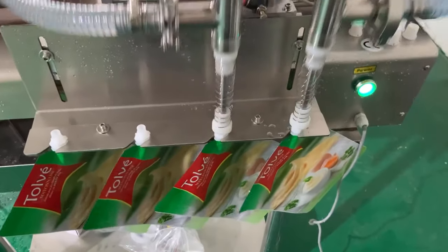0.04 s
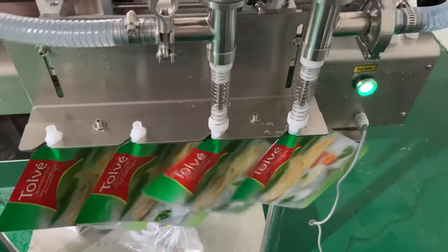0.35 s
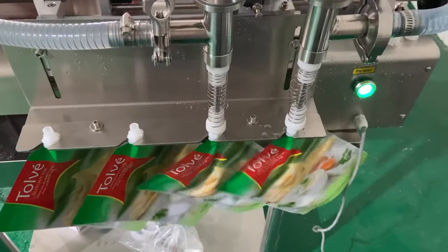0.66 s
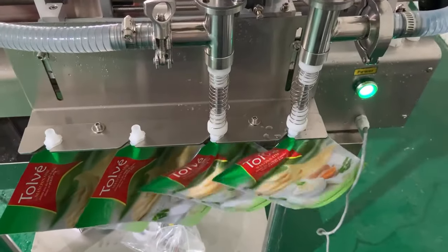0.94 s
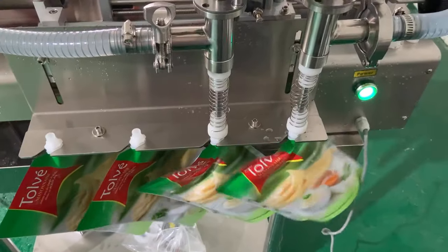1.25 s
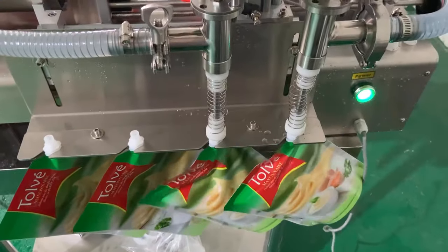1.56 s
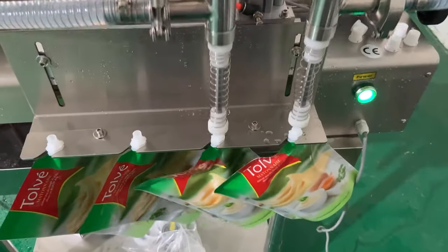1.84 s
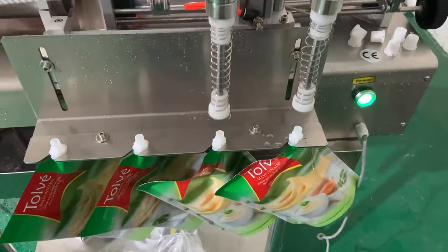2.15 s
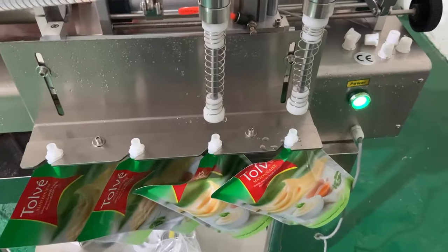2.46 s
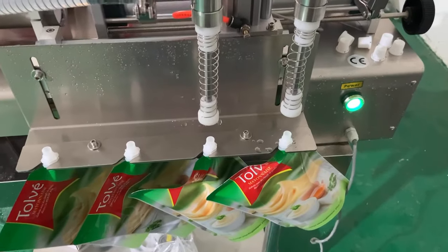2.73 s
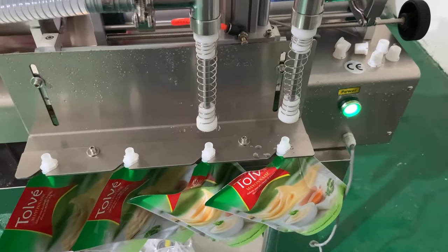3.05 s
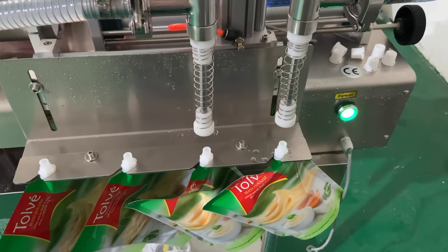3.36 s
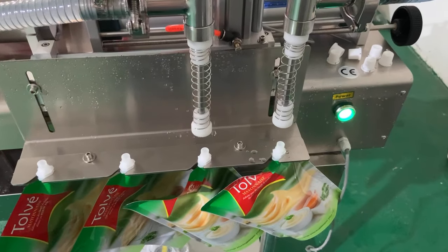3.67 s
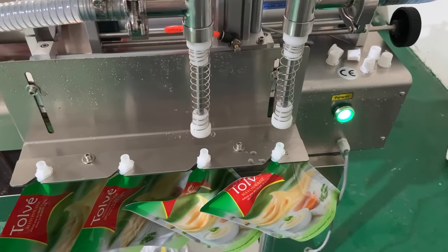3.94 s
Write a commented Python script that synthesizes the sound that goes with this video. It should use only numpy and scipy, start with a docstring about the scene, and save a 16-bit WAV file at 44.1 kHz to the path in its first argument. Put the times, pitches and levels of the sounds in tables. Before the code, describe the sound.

Air hisses loudly from a pouch filling machine close by from the start, with liquid rushing through ringing pipes. Around 1.2 to 1.6 seconds come thumps, a pipe shudder and a brighter jet of air. Hollow knocks sound at about 2.1 and 2.4 seconds as the hiss dies away. A metal valve clicks faintly at 2.5 and sharply at 3 seconds. Motor hum and factory rumble continue until 4 seconds.

```python
"""Air hisses from the cylinder of an air-driven pouch filler, heard close by in a workshop.
Liquid rushes into the pouches, its many tiny impacts ringing the pipes. The stroke ends in thumps,
a shudder and a second, brighter jet of air. The nozzles lift with hollow knocks, the air dies away
and a metal valve clicks. Behind it all are a motor's hum and the rumble of the factory."""
import sys
import numpy as np
from scipy import signal
from scipy.fft import rfft, irfft
from scipy.io import wavfile

SR = 44100
rng = np.random.default_rng(int(sys.argv[2]) if len(sys.argv) > 2 else 0)


def store_pcm(level_fs):
    """Save levels as 16-bit WAV."""
    pcm = np.round(np.clip(level_fs, -1, 1) * 32767).astype(np.int16)
    wavfile.write(sys.argv[1], SR, np.atleast_2d(pcm).T)


N = 176400  # 4 seconds

# How loud the escaping air is. Each row: time in seconds, level in dB.
EXHAUST_LEVEL = [(0, -29), (.04, -27.5), (.11, -32), (.23, -31), (.33, -28.5), (.51, -31), (.9, -34.5),
                 (1.21, -33.5), (1.45, -26), (1.69, -30), (2.03, -31.5), (2.21, -34.5), (2.34, -45.5),
                 (2.55, -56), (2.95, -75), (4, -84)]
# Its treble, which dulls as the pressure drops. Each row: time in seconds, boost or cut in dB.
EXHAUST_TREBLE = [(0, 2), (.55, -2.5), (1.1, 3.5), (1.6, -2), (1.95, -.5), (2.25, -7.5)]
# The tone of the exhaust, the second jet and the last air. Each row: frequency in Hz, strength in dB.
EXHAUST_COLOUR = [(200, -30), (700, -10.5), (1400, -6.5), (2000, -5.5), (2500, -5), (3500, -0.5),
                  (4600, 1.5), (6000, -2.5), (7200, -3), (8600, -6.5), (11000, -4), (11700, -9.5),
                  (12600, -31.5)]
JET_COLOUR = [(300, -24), (1000, -11), (2500, -4), (4300, 1.5), (5500, -2.5), (7000, 0.5), (8600, -0.5),
              (10500, 3), (11700, 0)]
BLEED_COLOUR = [(400, 0.5), (1100, 9.5), (1700, -1), (3000, -1.5), (5000, -3.5), (6000, -13), (7100, -3),
                (8000, -19), (11500, -27)]
# The whistles of the air outlets. Each row: pitch in Hz, width in Hz, strength in dB.
PORT_RESONANCES = [(1790, 18, -1.5), (2320, 20, -6), (2480, 21, -4), (3001, 45, -3.5), (3923, 26, 2.5),
                   (4290, 25, 1.5), (4520, 36, 3.5), (4780, 37, 0.5), (5280, 49, -1.5), (5950, 40, -7),
                   (6190, 31, 2), (10228, 23, -7), (10600, 29, -9.5)]

# How loud the rushing liquid and the shuddering pipes are. Each row: time in seconds, level in dB.
FLOW_LEVEL = [(0, -37.5), (.24, -43.5), (.27, -36), (.34, -40.5), (.38, -32), (.6, -32.5), (.69, -31),
              (.8, -31.5), (1.04, -30.5), (1.07, -25.5), (1.125, -25.5), (1.15, -30), (1.22, -27.5),
              (1.27, -26), (1.33, -35), (1.42, -31), (1.55, -41), (2.1, -43.5), (2.4, -49), (2.7, -73)]
SHUDDER_LEVEL = [(1.24, -79), (1.26, -37), (1.3, -28), (1.32, -35.5), (1.35, -31), (1.385, -30),
                 (1.43, -24), (1.49, -28), (1.54, -37), (1.63, -32.5), (1.72, -51), (2, -61)]
# How the pipes ring in the flow and in the shudder. Each row: pitch in Hz, width in Hz, strength in dB.
PIPE_RESONANCES = [(120.2, 50, 3.5), (253, 78, 4.5), (458, 80, 7.5), (801, 24, 0.5), (918.4, 35, 5),
                   (997, 58, 0.5), (945, 360, 1), (1205, 256, -1.5), (1535, 25, 2), (1595, 500, 2.5),
                   (2336, 1100, -9)]
SHUDDER_RESONANCES = [(233, 25, 5), (327, 130, -1.5), (441, 67, -4.5), (700, 210, -10.5)]
# Hollow knocks of pipes and pouches. Each row: start in seconds, ring pitch in Hz, ring strength in dB,
# hold in seconds, decay in seconds, scuff pitch in Hz, scuff strength in dB.
KNOCKS = [ (0.027, 247, -30, .008, 0.019, 400, -31.5), (.259, 463, -26.5, 0.0013, 0.0022, 700, -30.5),
          (.291, 500, -26.5, .002, 0.0032, 845, -32), (0.311, 430, -31, 0.0033, 0.0048, 990, -38),
          (0.684, 456, -32, 0.0018, 0.0032, 1040, -30), (1.065, 885, -25.5, 0.0041, 0.0051, 1430, -27.5),
          (1.109, 1810, -22, 0.0047, 0.0035, 960, -26), (1.238, 920, -18.5, 0.0013, 0.0026, 945, -27),
          (1.243, 180, -12, 0.0028, 0.006, 500, -20.5), (1.289, 450, -25.5, .006, 0.0043, 920, -29),
          (1.33, 206, -11, 0.0047, 0.003, 810, -25.5), (1.347, 204, -24.5, .004, 0.01, 834, -40),
          (1.396, 776, -22, 0.0011, 0.0034, 1500, -32), (1.402, 216, -12, 0.0018, 0.0041, 480, -24),
          (1.436, 278, -23.5, 0.0098, 0.0071, 450, -32), (1.485, 200, -24, .004, 0.0056, 400, -25),
          (1.59, 335, -24, .002, 0.0046, 980, -30), (1.607, 220.5, -25, 0.02, .010, 850, -29),
          (2.056, 905, -14, 0.0059, 0.00085, 1260, -27), (2.074, 253, -26.5, 0.0043, 0.0058, 455, -23.5),
          (2.352, 558, -18, 0.00082, 0.0026, 1280, -30.5), (2.36, 437, -13.5, 0.0024, 0.0046, 477, -24.5),
          (2.372, 493, -15.5, 0.0029, 0.0064, 1250, -23), (2.386, 365, -21, 0.0018, 0.003, 550, -26),
          (2.391, 219, -21.5, .002, 0.0078, 1060, -34), (2.998, 620, -38, .002, .003, 1110, -38.5)]
# Valve clicks. Each row: start in seconds, strength in dB, brightness in dB per octave.
VALVE_CLICKS = [(2.377, -50, 10.5), (2.386, -52, 9), (2.4815, -36, -1.5), (3, -25, -2.6),
                (3.0046, -32.5, -4)]
# How the valve rings. Each row: pitch in Hz, width in Hz, strength in dB.
VALVE_RESONANCES = [(620, 280, -5), (1000, 450, -6), (1610, 360, 4), (2120, 320, 4.5), (2510, 430, 1.5),
                    (2890, 300, -1), (3860, 310, 2.5), (6670, 760, 0), (10200, 1500, -5.5)]

# The motor's tones. Each row: pitch in Hz, strength in dB, amount of wavering (0 is steady).
HUM_TONES = [(60.9, -34.5, 0.4), (101.5, -46, 0.75), (119.7, -54, 0.66), (320.6, -49, 1)]
# The hum throbs once the stroke ends. Each row: time in seconds, boost or cut in dB.
HUM_THROB = [(0, -19), (.65, -6), (1.18, -12), (1.33, 6.5), (1.5, -6), (1.68, 3), (1.88, -0.5), (2.12, -1),
             (2.22, -8.5), (2.35, 0.5), (2.47, -4.5), (2.57, 4), (2.69, -3.5), (2.85, 0), (2.98, -6),
             (3.14, 3), (3.25, -7.5), (3.38, 5.5), (3.47, -4.5), (3.71, 2.5), (4, 0.5)]
# The low rumble of the drive. Each row: pitch in Hz, width in Hz, strength in dB.
RUMBLE_RESONANCES = [(99, 31.5, 0), (143.5, 40, -3)]
# The tone of the hall's noise and of its echo. Each row: frequency in Hz, strength in dB.
HALL_COLOUR = [(20, -18), (40, -6), (60, -4.5), (105, -2.5), (160, -3.5), (240, -10), (330, -4),
               (480, -9.5), (650, -20), (950, -21), (1250, -25.5), (1550, -33.5), (2000, -38), (2700, -42),
               (4200, -38), (4800, -53.5), (8300, -50.5), (11500, -57.5)]
ECHO_COLOUR = [(80, -9), (230, 1), (450, -2), (650, 2), (920, -3), (1200, 2.5), (2300, 1), (4200, -6.5),
               (6800, -4), (11000, -13)]
# How wide the noises sound; one narrow treble band, near 8 to 9.5 kHz, is heard only at the sides. Each row:
# frequency in Hz, level of the sides over the middle in dB.
STEREO_WIDTH = [(60, -12.5), (150, -21.5), (300, -14), (480, -10), (680, 0.5), (950, -5), (1500, -0.4),
                (5500, -1.5), (7300, -2), (7750, 13), (8100, 42), (9000, 55.5), (9450, 16), (9900, -7),
                (10400, -10.5), (10700, -45.5)]


def air(treble_hz=7800):
    """Air hisses out of the ports; a brighter jet joins as the valve switches; the rest bleeds away."""
    stream = hiss(EXHAUST_COLOUR) + port_whistles()
    dull = soften(stream, treble_hz, steepness=8)
    treble = (stream - dull) * curve(EXHAUST_TREBLE)
    exhaust = (dull + treble) * curve(EXHAUST_LEVEL)
    jet = hiss(JET_COLOUR) * gain(-22.5) * envelope(start=1.236, attack=.0087, hold=.17, decay=.11)
    bleed = noise(BLEED_COLOUR) * gain(-42) * envelope(start=2.244, attack=.13, hold=0, decay=.25)
    flutter = gain(.89 * wander(25))
    return (exhaust + jet + bleed) * flutter * pan(.15)


def hiss(tone, panel_share=.6, drift_hz=1.55):
    """An air jet. Part of it bounces off steel panels, whose quick echoes give it a drifting tone."""
    echoes = rng.standard_normal((3, 2, N)) * envelope(start=0, attack=.0002, hold=0, decay=.0044)
    paths = filtered(rng.standard_normal(N), rfft(echoes))
    weights = np.array([wander(drift_hz) for _ in paths])
    weights /= np.linalg.norm(weights, axis=0)
    bounced = normalise(sum(weight * path for weight, path in zip(weights, paths)))
    diffuse = rng.standard_normal((2, N))
    pair = np.sqrt(panel_share) * bounced + np.sqrt(1 - panel_share) * diffuse
    return stereo(filtered(pair, colour(tone)))


def port_whistles(level_db=-7, flicker_db=3.5):
    """Air whistles faintly in the exhaust ports, each note coming and going on its own."""
    whistles = 0
    for port in PORT_RESONANCES:
        flicker = gain(flicker_db * np.tanh(wander(5.4)))
        whistles += flicker * resonate(rng.standard_normal((2, N)), [port])
    return gain(level_db) * stereo(whistles)


def liquid(flutter_db=1.0):
    """Liquid rushes into the pouches; the pipes shudder at the end of the stroke."""
    rush = splatter(PIPE_RESONANCES) * curve(FLOW_LEVEL) * gain(flutter_db * wander(34))
    shudder = splatter(SHUDDER_RESONANCES) * curve(SHUDDER_LEVEL)
    return rush + shudder


def splatter(resonances, hits_per_second=2500, scatter_db=2.5):
    """Many tiny impacts of liquid, each of a random size, make the pipes ring."""
    hits = rng.random((2, N)) < hits_per_second / SR
    sizes = gain(scatter_db * np.minimum(rng.exponential(size=(2, N)), 4))
    signs = rng.choice([-1, 1], (2, N))
    return stereo(resonate(hits * sizes * signs, resonances))


def knocks(sharp_share=.08, settle_s=.0044, wobble_share=.02):
    """Each knock is a dull scuff of contact, then a hollow ring that swells and quickly dies."""
    out, t = np.zeros(N), seconds()
    clock = t + wobble_share * np.cumsum(wander(150)) / SR  # an uneven clock makes the pitch wobble
    for start, ring_hz, ring_db, hold, decay, scuff_hz, scuff_db in KNOCKS:
        age = np.maximum(t - start, 0)
        lead = sharp_share * settle_s * (1 - np.exp(-age / settle_s))  # starts high, then settles
        ring_time = clock - np.interp(start, t, clock) + lead
        ring = np.sin(2 * np.pi * ring_hz * ring_time)
        out += gain(ring_db) * ring * envelope(start + .0024, attack=.0038, hold=hold, decay=decay)
        scuff = normalise(resonate(rng.standard_normal(N), [(scuff_hz, .34 * scuff_hz, 0)]))
        out += gain(scuff_db) * scuff * envelope(start, attack=.0018, hold=.00075, decay=.008)
    return add_echo(soften(out, above_hz=1950), echo_db=-4)


def valve_clicks():
    """Sharp cracks make the small metal valve ring."""
    out = np.zeros(N)
    for start, db, brightness in VALVE_CLICKS:
        crack = rng.standard_normal(N) * envelope(start, attack=.00011, hold=.00056, decay=.0018)
        crack = filtered(crack, gain(brightness * np.log2(bins() / 3000)))
        out += 2 * gain(db) * resonate(crack, VALVE_RESONANCES)
    return add_echo(out, echo_db=0)


def motor_hum():
    """A motor hums with a few low, wavering tones that throb together."""
    hum = 0
    for hz, db, amount in HUM_TONES:
        waver = (wander(9) + 1j * wander(7.2)) / np.sqrt(2)  # sways both loudness and pitch
        tone = (1 + amount * waver) * np.exp(2j * np.pi * hz * seconds())
        hum += gain(db) * normalise(tone.real)
    return hum * curve(HUM_THROB) * pan(-2.4)


def drive_rumble(level_db=-40.5, rise_s=1):
    """The drive's low rumble builds up, then stays."""
    rumble = stereo(resonate(rng.standard_normal((2, N)), RUMBLE_RESONANCES))
    return rumble * gain(level_db) * np.minimum(seconds() / rise_s, 1)


def hall_noise(level_db=-38.5, flicker_db=1.37):
    """The constant noise of the factory hall, flickering a little."""
    return noise(HALL_COLOUR) * gain(level_db + flicker_db * wander(15))


def add_echo(sound, echo_db, gap_s=.004, fade_s=.42):
    """The workshop's echo surrounds a close sound, fading by 60 dB in fade_s seconds."""
    tail = noise(ECHO_COLOUR) * envelope(gap_s, attack=gap_s, hold=0, decay=fade_s / np.log(1000))
    response = rfft(tail)
    midrange = (bins() > 200) & (bins() < 2000)
    response /= np.sqrt(np.mean(abs(response[:, midrange]) ** 2))
    echo = signal.fftconvolve(sound[None], irfft(response, N), axes=1)[:, :N]
    return sound + gain(echo_db) * echo


def gain(db):
    """Turn decibels into a number to multiply by."""
    return 10 ** (np.asarray(db) / 20)


def normalise(sound):
    """Scale a sound so that its average level (rms) is 1."""
    return sound / np.sqrt(np.mean(sound ** 2))


def seconds():
    """The time of every sample."""
    return np.arange(N) / SR


def bins():
    """The frequency in Hz of every point in a spectrum."""
    return np.maximum(np.arange(N // 2 + 1) * SR / N, 1)


def curve(rows):
    """Join rows of seconds and dB into a gain over time."""
    return gain(np.interp(seconds(), *np.array(rows).T))


def colour(rows):
    """Join rows of Hz and dB into a gain for every frequency."""
    hz, db = np.array(rows).T
    return gain(np.interp(np.log(bins()), np.log(hz), db))


def envelope(start, attack, hold, decay):
    """Rise in a straight line, hold, then die away. All times are in seconds."""
    age = seconds() - start
    return np.clip(age / attack, 0, 1) * np.exp(-np.maximum(age - attack - hold, 0) / decay)


def filtered(sound, response):
    """Multiply each frequency of a sound by its own gain."""
    return irfft(rfft(sound) * response, N)


def soften(sound, above_hz, steepness=4):
    """Turn down the high frequencies."""
    return filtered(sound, 1 / (1 + (bins() / above_hz) ** steepness))


def resonate(sound, rows):
    """Keep the parts of a sound near the pitches at which an object rings."""
    f = bins()
    peaks = (gain(db) / (1 + 1j * (f * f - hz * hz) / (2 * f * width)) ** 2 for hz, width, db in rows)
    return filtered(sound, sum(peaks))


def wander(rate_hz):
    """A smooth random value, about 1 in size, that moves about rate_hz times a second."""
    return normalise(soften(rng.standard_normal(N), rate_hz))


def noise(tone):
    """Stereo noise with the given tone."""
    return stereo(filtered(rng.standard_normal((2, N)), colour(tone)))


def stereo(pair):
    """Use two unrelated signals as middle and sides, giving left and right at an average level of 1."""
    width = colour(STEREO_WIDTH)
    shares = np.array([np.ones_like(width), width]) / np.hypot(1, width)
    middle, side = filtered(pair, shares)
    return normalise(np.array([middle + side, middle - side]))


def pan(db):
    """Left and right gains that make the left louder by db (the right, if negative)."""
    return gain(np.array([[db], [-db]]) / 2)


def scene():
    """The pouch filler, with the factory behind it."""
    filler = air() + (liquid() + knocks()) * pan(.89) + valve_clicks()
    return filler + motor_hum() + drive_rumble() + hall_noise()


def record(dry):
    """Cut away the treble above 11750 Hz."""
    return signal.sosfilt(signal.ellip(12, .2, 80, 11750, fs=SR, output="sos"), dry)


dry = scene()
out = record(dry)
store_pcm(out)
```